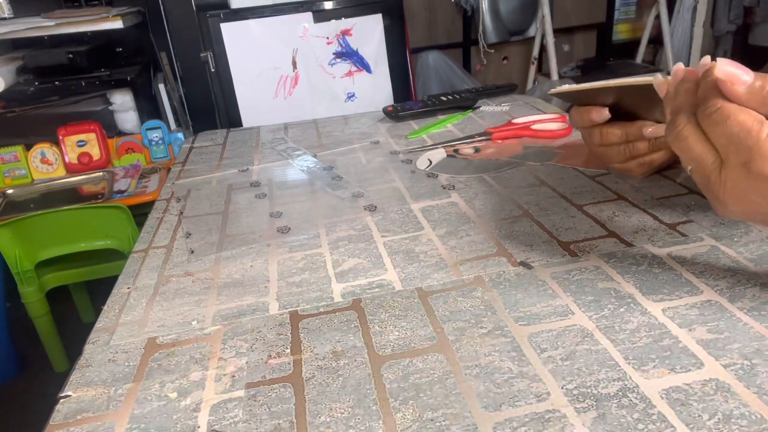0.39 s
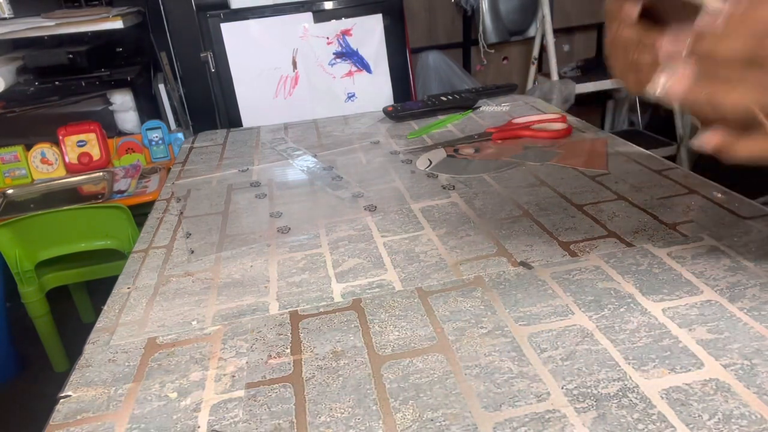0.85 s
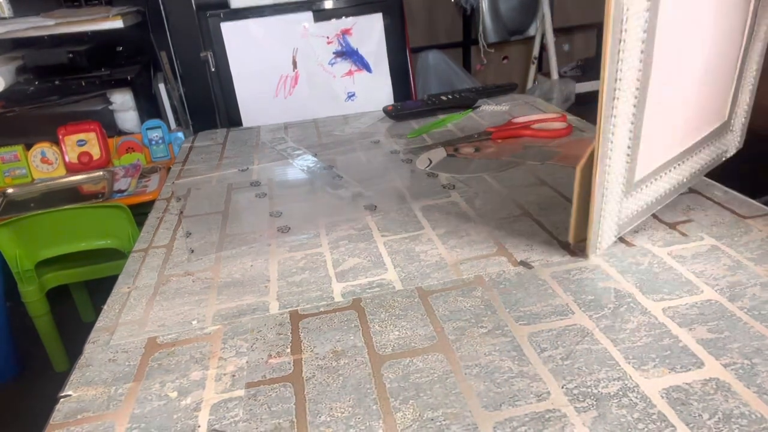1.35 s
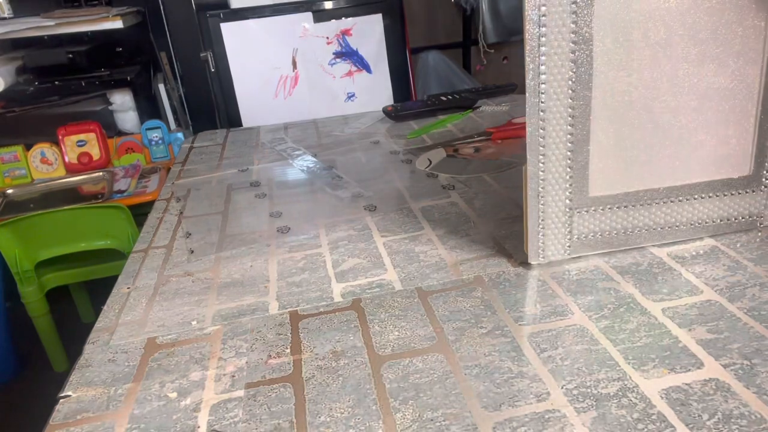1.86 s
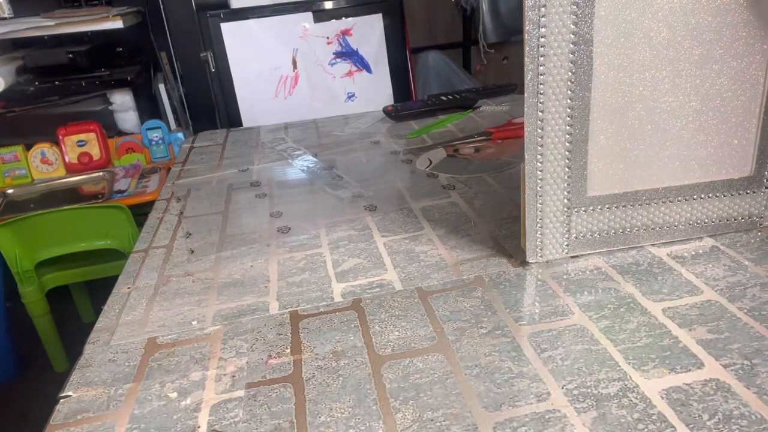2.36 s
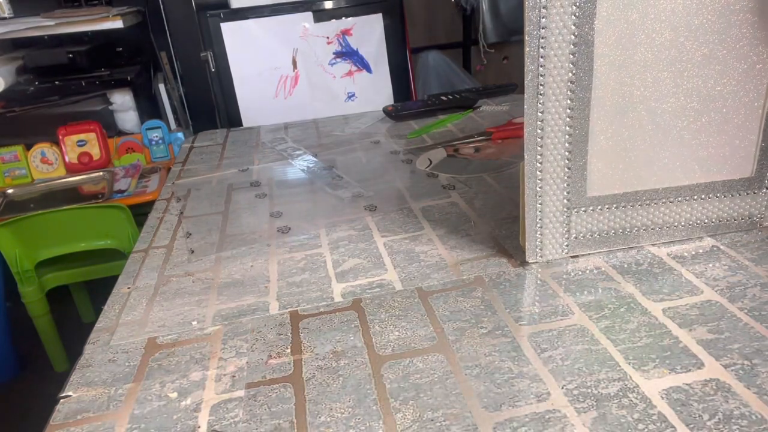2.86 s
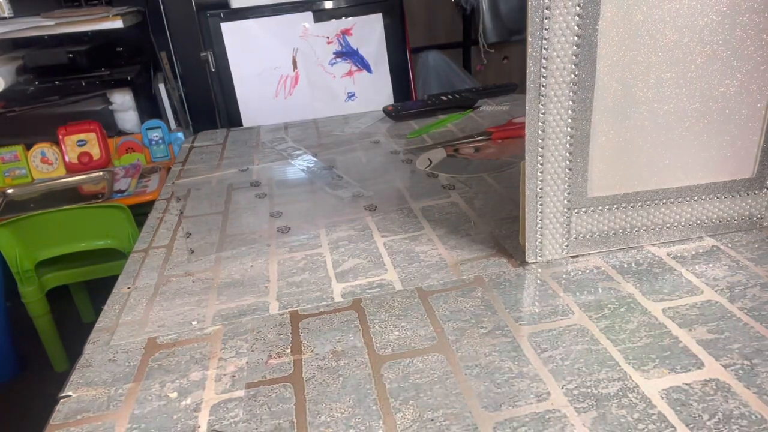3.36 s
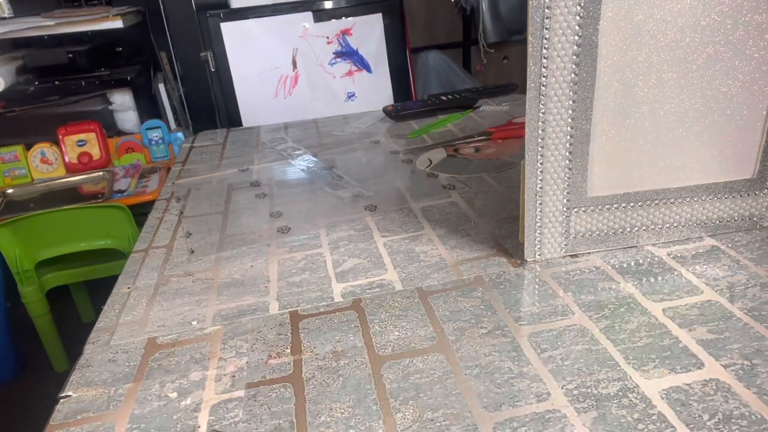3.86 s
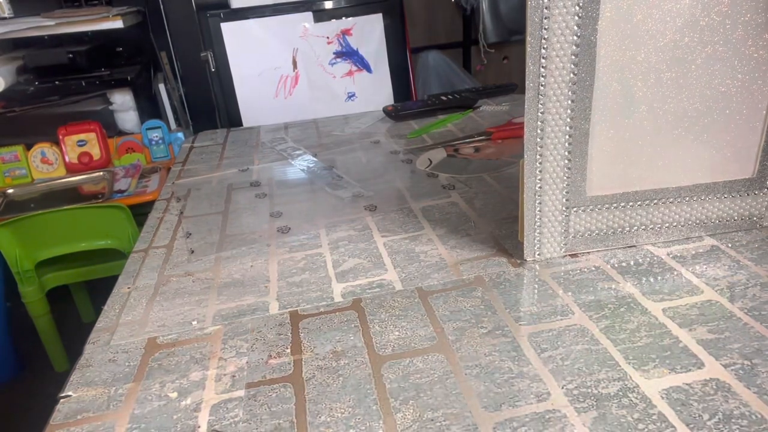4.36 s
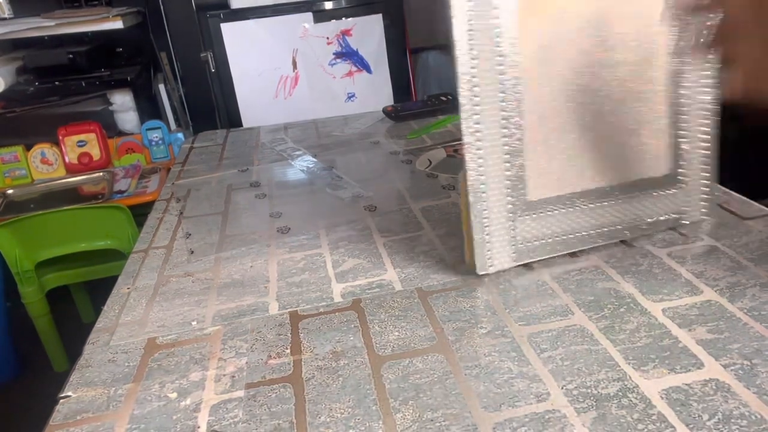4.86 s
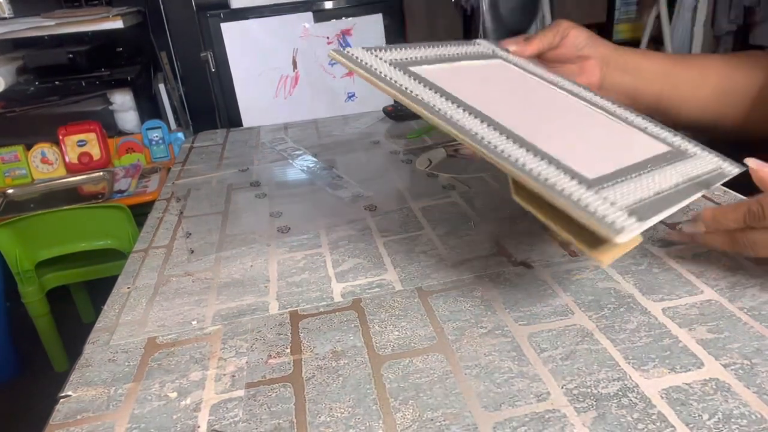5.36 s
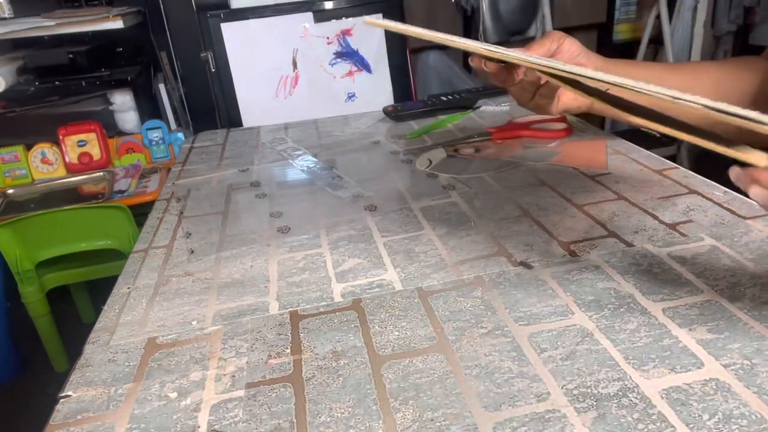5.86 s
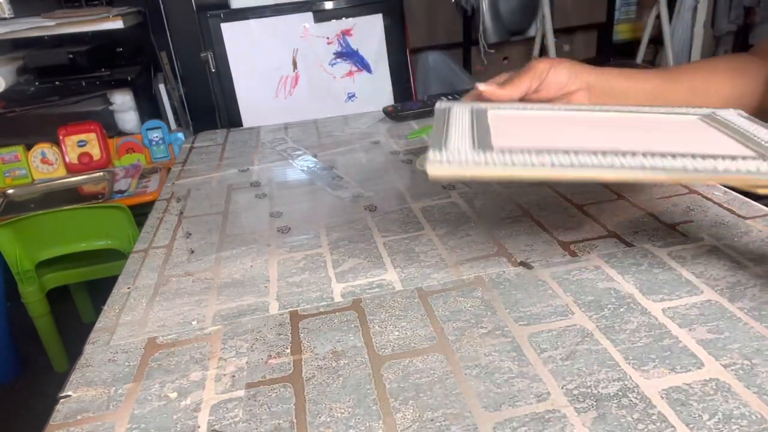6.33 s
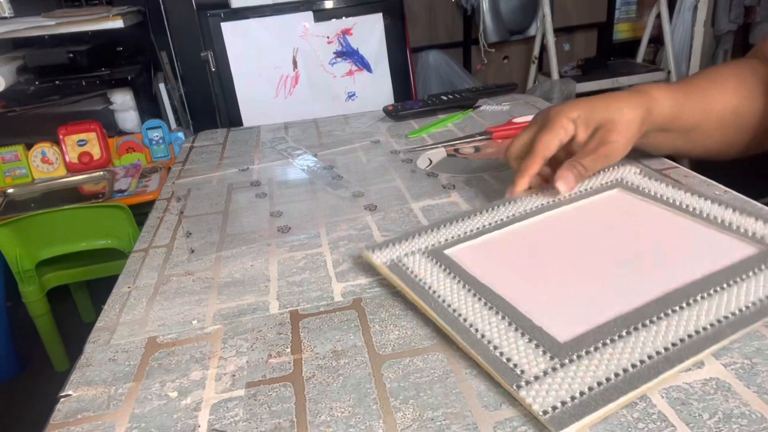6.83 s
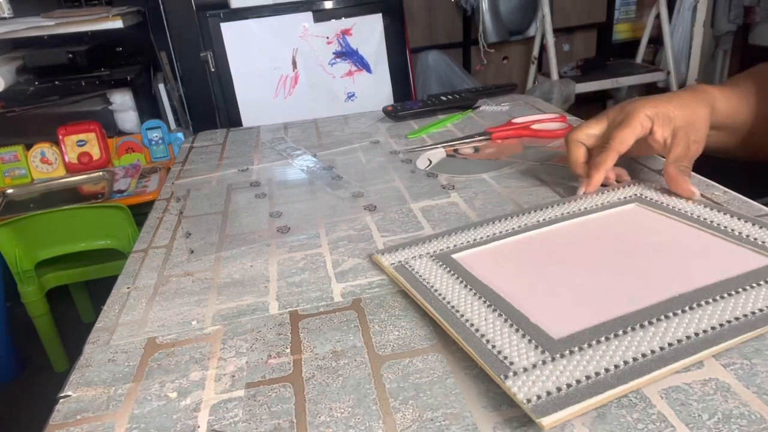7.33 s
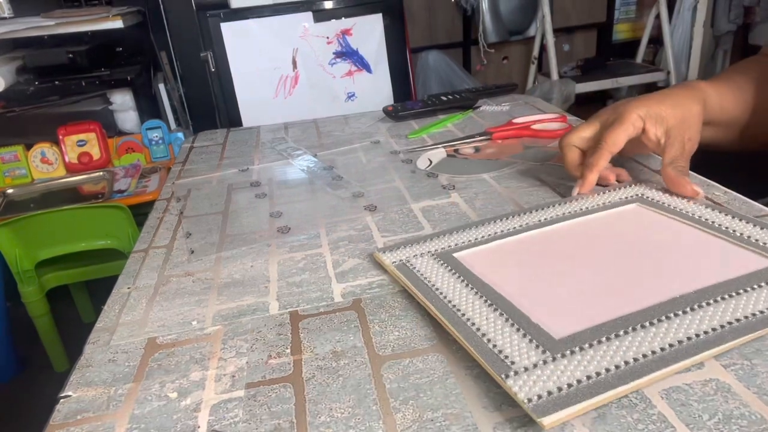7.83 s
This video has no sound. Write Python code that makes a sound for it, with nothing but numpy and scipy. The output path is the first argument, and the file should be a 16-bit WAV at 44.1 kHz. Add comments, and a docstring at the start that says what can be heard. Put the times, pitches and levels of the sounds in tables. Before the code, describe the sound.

Close, dry card knocks, sharp cracks and rubbing as a light frame is stood up, shifted and laid flat on a table in a quiet room.

```python
"""Over a faint room, hands take up a cardboard frame: first small cracks, then from 0.9 s knocks and scuffs.
A deep knock at 1.3 s sets it down; rubbing and shifting follow, with sharp cracks at 3.6 and 4.2 s.
At 4.45 s the frame is drawn in front of a phone on the table; near 5.4 s it is calmer and a low hum swells.
At 6.65 s it is laid down in a flurry of knocks, then faint touches. Noise bursts crack, damped modes knock,
filtered grains rub, noise-driven modes shake the table. The right microphone port hears the hands delayed."""
import sys
import numpy as np
from scipy import signal
from scipy.fft import rfft, irfft
from scipy.io import wavfile
from scipy.ndimage import uniform_filter1d

SR = 44100
rng = np.random.default_rng(int(sys.argv[2]) if len(sys.argv) > 2 else 0)


def makeup_ratio(level_db):
    """Linear amplitude ratio for a level in decibels (20 dB per factor of ten)."""
    decades = np.asarray(level_db, float) / 20
    return 10 ** decades


def dump_mix(stems):
    """Bounce the given channels to the path in sys.argv[1] as a 16-bit WAV at rate SR."""
    frames = np.atleast_2d(stems).T  # one column per channel
    limited = np.clip(frames, -1, 1)  # hard clip at full scale
    pcm = np.round(limited * 32767).astype(np.int16)
    wavfile.write(sys.argv[1], SR, pcm)


N = 351036
T = np.arange(N) / SR


def level(x, db):
    """Scale to an rms level."""
    return x * makeup_ratio(db) / np.sqrt(np.mean(x ** 2))


def curves(table):
    """Columns of a table, interpolated to one value a sample."""
    s, *columns = np.transpose(table)
    return [np.interp(T, s, c) for c in columns]


def walk(rate_hz):
    """Random levels held 1 / rate_hz s and slewed; spread near 1."""
    k = int(SR / rate_hz)
    steps = np.repeat(rng.standard_normal(N // k + 1), k)
    return 1.2 * uniform_filter1d(steps, k)[:N]


def ring(x, peaks):
    """Sum of resonances (Hz, width Hz, dB) of alternating sign."""
    return sum((-1) ** k * makeup_ratio(db) * signal.lfilter(*signal.iirpeak(hz, hz / width_hz, fs=SR), x)
               for k, (hz, width_hz, db) in enumerate(peaks))


def favour(x, peaks, near_hz, slope_db):
    """Resonances weighted by their distance in octaves from a moving pitch, at steady total power."""
    weights = [makeup_ratio(-slope_db * np.abs(np.log2(p[0] / near_hz))) for p in peaks]
    parts = [(-1) ** k * ring(x, [p]) for k, p in enumerate(peaks)]
    power = sum(w ** 2 * np.mean(y ** 2) for w, y in zip(weights, parts))
    return sum(w * y for w, y in zip(weights, parts)) / np.sqrt(power)


def add(out, s, sound, pan_db):
    """Place a sound between the ports; pan_db is left minus right."""
    i = int(s * SR)
    n = min(len(sound), N - i)
    out[:, i:i + n] += sound[:n] * makeup_ratio(np.array([[pan_db], [-pan_db]]) / 2)


# How the frame is held. Each row: start in seconds, knocks left minus right in dB,
# upper table modes re deep in relative dB, favoured card body in Hz, favoured sheet in Hz,
# favoured table pitch in Hz, share of a knock that rings freely (0-1).
POSES = [(0.0, -0.5, -8.5, 520, 2160, 186, 0.97), (1.2, 5, -1, 345, 2240, 157, 0.96),
         (1.5, 20.5, -3, 560, 1820, 170, 0.1), (2.05, 18.5, 1.5, 500, 3240, 173, 0.33),
         (3.7, 19, 0, 480, 1990, 155.6, .45), (4.8, 11, 1, 400, 2910, 161, 0.69),
         (5.199, 5.5, -15, 430, 3370, 199, 0.63), (6.62, 10, -4, 335, 1800, 212, 0.73),
         (7.2, 8.5, -6.5, 350, 2800, 185.7, 0.76)]


def pose():
    """Columns of the pose table, each held until the next pose."""
    s, *columns = np.transpose(POSES)
    return np.array(columns)[:, np.maximum(np.searchsorted(s, T, "right") - 1, 0)]


# Room noise spectrum. Each row: frequency in Hz, relative density in dB per Hz.
ROOM_SPECTRUM = [(18, -17), (30, 1.5), (64, -29), (239, -18.5), (540, -34), (844, -36.5), (6210, -45.5),
                 (8740, -54), (11700, -44), (16000, -56.5)]
ROOM_DB = -71


def room():
    """Faint steady air noise; its bass is alike at both ports."""
    f_hz = np.maximum(np.fft.rfftfreq(N, 1 / SR), 1)
    hz, db = np.transpose(ROOM_SPECTRUM)
    shape = makeup_ratio(np.interp(np.log(f_hz), np.log(hz), db))
    mid, side = rfft(rng.standard_normal((2, N))) * shape
    side = np.minimum(f_hz / 120, 1) * side
    return level(irfft(mid + side * np.array([[1], [-1]]), N), ROOM_DB)


HUM_S, HUM_LENGTH_S, HUM_HZ, HUM_WIDTH_HZ, HUM_DB = 5.42, 1.28, 92.3, 3.7, -65.5


def low_hum():
    """Narrow-band noise, a slightly wavering hum, swells for a while, alike at both ports."""
    tone = level(ring(rng.standard_normal(N), [(HUM_HZ, HUM_WIDTH_HZ, 0)]), HUM_DB)
    return tone * np.sin(np.pi * np.clip((T - HUM_S) / HUM_LENGTH_S, 0, 1)) ** .5


def murmur(x, modes, widen):
    """Modes driven by noise, damped further by the hands, at unit rms."""
    return level(ring(x, [(hz, widen / t60_s, db) for hz, db, t60_s in modes]), 0)


# Table top shaken by arms and frame. Each row: time in seconds, relative level in dB.
SHAKE_LEVELS = [(0.0, -60), (0.06, -72), (0.3, -95), (0.68, -77.5), (0.93, -60.5), (1.2, -74.5),
                (1.42, -53), (1.6, -66), (1.82, -47.5), (1.97, -69.5), (2.5, -67.5), (3.2, -63),
                (3.55, -69), (3.7, -55.5), (4.0, -71), (4.2, -50), (4.54, -64.5), (4.9, -52), (5.2, -65.5),
                (5.5, -64), (6.5, -60.5), (6.95, -47.5), (7.35, -61.5), (7.96, -62)]
# Deep, then upper table modes. Each row: frequency in Hz, relative level in dB, free t60 in seconds.
DEEP_MODES = [(48.54, -0.5, 0.15), (72.5, 1, 0.16), (103.1, -5.5, 0.21)]
TABLE_MODES = [(146.8, 3, 0.11), (178.5, 5.5, 0.11), (198.2, 0.5, 0.17), (271, -11, 0.085)]
SHAKE_WOBBLE_DB = 5.5


def shake():
    """Small uneven pushes keep the table top murmuring; the pose sets the share of the upper modes."""
    base_db = curves(SHAKE_LEVELS)[0] + 3.6
    upper_re_deep_db = uniform_filter1d(pose()[1], size=2000)
    upper_db = base_db - 4 + upper_re_deep_db + SHAKE_WOBBLE_DB * walk(8)
    deep_db = base_db + SHAKE_WOBBLE_DB * walk(6.6)
    mid, side = (makeup_ratio(deep_db) * murmur(push, DEEP_MODES, widen=3.3)
                 + makeup_ratio(upper_db) * murmur(push, TABLE_MODES, widen=6.4)
                 for push in rng.standard_normal((2, N)))
    return mid + makeup_ratio(-7) * side * np.array([[1], [-1]])


TICKS_PER_S, TICK_RE_GRAIN_DB = 68, 14  # lone fibres catching


def grains(spread_db):
    """Dense slips of very uneven size with lone ticks: one stream for the sheet's face, one for its edge."""
    ticks = makeup_ratio(TICK_RE_GRAIN_DB) * (rng.random(N) < TICKS_PER_S / SR)
    size = makeup_ratio(spread_db * rng.exponential(size=N)) + makeup_ratio(spread_db) * ticks
    return rng.standard_normal((2, N)) * size


# Fingers resting and sliding on card and tape. Each row: time in seconds, pressure in relative dB,
# dryness in dB (lowers the card body, slightly lifts the top).
RUB_PRESSURE = [(0.0, -105, 13), (0.55, -78.5, -1.5), (0.75, -63.5, 23), (1.0, -56, -13.5),
                (1.2, -65.5, 14), (1.35, -63, -13.5), (1.6, -65.5, 15), (1.88, -62, -12.5),
                (1.98, -82.5, -1), (2.3, -62.5, -2), (2.55, -69, 8), (2.8, -62.5, 7.5), (3.55, -55, 16.5),
                (3.9, -68, 8.5), (4.15, -60.5, -2.5), (4.48, -87, -4.5), (4.62, -49, -3.5), (5.03, -58, 6),
                (5.12, -82, 2.5), (5.6, -95.5, 5.5), (6.05, -84, 5), (6.2, -68.5, 9), (6.56, -62.5, 23),
                (6.75, -55, -4), (7.0, -65, -12), (7.3, -83, -15), (7.8, -80, 4), (7.96, -63.5, -20.5)]
# Short scuffs of an edge or fingertip. Each row: start in seconds, length in seconds,
# hiss, card body and top, each in relative dB.
SCUFF_STROKES = [(0.746, 0.1, -82, -74, -62.5), (0.874, 0.068, -31, -30.5, -73),
                 (0.933, 0.078, -42, -37, -63), (0.998, 0.11, -50, -62, -57),
                 (1.083, 0.11, -51, -59.5, -56), (1.294, 0.088, -45, -37, -56),
                 (1.52, 0.21, -52.5, -68.5, -65), (1.664, 0.18, -58, -59.5, -62),
                 (1.787, 0.095, -47.5, -63, -65), (1.841, 0.15, -55.5, -51.5, -66),
                 (2.321, 0.095, -52.5, -89, -63), (2.692, 0.044, -69, -52, -58),
                 (2.945, 0.044, -54, -57, -89), (3.137, 0.05, -44, -57, -54.5),
                 (3.46, 0.013, -66, -73, -56), (3.605, 0.076, -40, -60, -48), (3.76, 0.081, -73, -85, -69),
                 (4.073, 0.088, -76, -59, -80), (4.171, 0.08, -59, -40, -48.5),
                 (4.372, 0.06, -48, -46.5, -85), (4.558, 0.083, -47, -40.5, -62),
                 (4.636, 0.018, -60, -60, -45), (4.663, 0.047, -39, -50, -89),
                 (4.72, 0.08, -32.5, -42, -54), (4.856, 0.053, -64, -51, -58),
                 (5.006, 0.077, -65, -55, -68), (5.138, 0.059, -98, -70, -75),
                 (5.251, 0.12, -80, -90.5, -79), (5.438, 0.11, -72, -91, -77.5),
                 (5.67, 0.08, -70, -78.5, -72.5), (5.702, 0.054, -58.5, -75, -66.5),
                 (5.787, 0.14, -74.5, -79, -83), (5.983, 0.14, -69.5, -60, -69),
                 (6.103, 0.11, -95, -60.5, -73), (6.267, 0.18, -59, -75.5, -58),
                 (6.48, 0.36, -86, -66, -51.5), (6.642, 0.079, -46, -36, -57), (6.76, 0.061, -62, -61, -55),
                 (6.807, 0.06, -71, -48, -75), (6.897, 0.068, -55, -44, -60), (7.31, 0.04, -95, -57.5, -73),
                 (7.924, 0.046, -74.5, -62, -58.5)]
# Scuffs that gather and stop short against an edge. Columns as for the scuffs above.
STOP_STROKES = [(1.689, 0.089, -53, -45.5, -75), (2.77, .13, -58, -99, -65),
                (3.178, 0.054, -47, -97, -48.5), (3.297, 0.053, -85, -63, -62.5),
                (3.487, 0.14, -44.5, -68, -53), (5.688, 0.11, -47.5, -65.5, -53),
                (6.593, 0.089, -53, -66, -43.5), (7.117, .11, -79.5, -50, -68)]
SCUFF_PEAK, STOP_PEAK = .3, 0.78  # place of the peak within a stroke, 0-1
# Card modes. Each row: frequency in Hz, relative level in dB, free t60 in seconds.
CARD_MODES = [(324.8, -1, 0.11), (390, 0.5, 0.066), (497.5, -1, 0.041), (560, 1.5, 0.088),
              (645.4, 1, 0.079), (726, -2.5, 0.028), (1010, -6.5, 0.011), (1090, -4.5, 0.017),
              (1300, -18.5, 0.03)]
# Resonances of the sheet's face, then of its edge. Each row: frequency in Hz, width in Hz, relative dB.
SHEET_PEAKS = [(1650, 1100, 3), (2430, 1460, 4.5), (3330, 2200, 7), (4290, 1400, 11.5)]
SHEET_TOP_PEAKS = [(7000, 11800, -2.5), (8790, 1100, 9), (13330, 2900, -1), (14260, 5000, -2)]
TOP_RE_HISS_DB, TOP_PER_DRYNESS = -2.5, 0.1


def rub():
    """Skin and edges slip over the sheet, fluttering, and set its body humming."""
    pressure_db, dry_db = curves(RUB_PRESSURE)
    top_re_hiss_db = TOP_RE_HISS_DB + TOP_PER_DRYNESS * dry_db
    gain = makeup_ratio(pressure_db + np.array([0 * T, -dry_db, top_re_hiss_db]))
    strokes = [(SCUFF_PEAK, r) for r in SCUFF_STROKES] + [(STOP_PEAK, r) for r in STOP_STROKES]
    for peak, (s, length_s, *db) in strokes:
        u = np.linspace(0, 1, int(length_s * SR))
        i = min(int(s * SR), N - len(u))
        swell = np.sin(np.pi * u ** (np.log(.5) / np.log(peak)))
        gain[:, i:i + len(u)] += makeup_ratio(np.array(db))[:, None] * swell
    flutter_db = 2.5 * walk(45) + np.array([1.5 * walk(70) for _ in range(3)])
    hiss, body, top = gain * makeup_ratio(flutter_db)
    # the grip wanders, and with it the resonances that speak
    wander_octaves = np.array([0.2 * walk(12), 0.19 * walk(12)])
    body_hz, sheet_hz = pose()[2:4] * 2 ** wander_octaves
    slips, edge_slips = grains(spread_db=3.0)
    held_card = [(hz, 4.1 / t60_s, db) for hz, db, t60_s in CARD_MODES]  # hands damp and widen the modes
    sound = hiss * favour(slips, SHEET_PEAKS, sheet_hz, slope_db=10.5)
    sound = sound + top * level(ring(edge_slips, SHEET_TOP_PEAKS), 0)
    sound = sound + body * favour(slips, held_card, body_hz, slope_db=9.5)
    return sound * makeup_ratio(np.array([[.7], [-.7]]))


# An edge sliding on the table. Each row: start in seconds, length in seconds, level in dB.
SING_STROKES = [(4.988, 0.092, -66.5), (6.72, 0.1, -56), (6.845, 0.043, -48.5)]
SING_HZ, SING_WIDTH_HZ = 1090, 34


def sing():
    """A dragged edge keeps a narrow card mode sounding."""
    out = np.zeros((2, N))
    tone = level(ring(rng.standard_normal(N), [(SING_HZ, SING_WIDTH_HZ, 0)]), 0)
    for s, length_s, db in SING_STROKES:
        n = int(length_s * SR)
        add(out, s, makeup_ratio(db) * tone[int(s * SR):][:n] * np.sqrt(np.hanning(n)), 2.0)
    return out


def blow(modes, rise_s, chance, near_hz=None):
    """Damped modes with a common rise, each with its own strength, pitch and phase; peak 1."""
    t = np.arange(int(.35 * SR)) / SR
    hz, db, t60_s = np.transpose(modes)[:, :, None]
    if near_hz:
        db = db - 25.5 * np.abs(np.log2(hz / near_hz))  # the spot struck favours some modes
    tone = np.sin(2 * np.pi * (hz * (1 + 0.033 * chance[0]) * t + 0.19 * chance[1]))
    decay = np.exp(-np.log(1000) * t / t60_s)
    sound = np.sum(makeup_ratio(db + 3.6 * chance[2]) * tone * decay, axis=0)
    sound = sound * (1 - np.exp(-(t / rise_s) ** 2))
    return sound / np.max(np.abs(sound))


SNAP_FROM_HZ, SNAP_TO_HZ, SNAP_FALL_S = 2030, 350, .0014
SNAP_FADE_S, SNAP_RE_CARD_DB = 0.002, -2


def card_snap():
    """The bending wave of a knock arrives treble first: a short falling chirp."""
    t = np.arange(600) / SR
    fall = (SNAP_FROM_HZ - SNAP_TO_HZ) * SNAP_FALL_S * (1 - np.exp(-t / SNAP_FALL_S))
    turns = SNAP_TO_HZ * t + fall
    return np.sin(2 * np.pi * turns) * t / SNAP_FADE_S * np.exp(1 - t / SNAP_FADE_S)


# Contacts of card and table. Each row: start in seconds, card, table and deep table,
# each in relative dB, favoured card pitch in Hz.
KNOCK_HITS = [(0.33, -54.5, -88, -71, 1130), (0.605, -49, -91, -68, 1020), (0.88, -22, -59, -55, 610),
              (0.884, -28.5, -58.5, -59, 1080), (0.898, -25, -35.5, -36.5, 530),
              (0.992, -31, -44.5, -75, 560), (1.302, -17, -21.5, -12, 328), (1.329, -21, -26, -36, 318),
              (1.344, -20, -20.5, -57, 330), (1.489, -49.5, -75, -74, 335), (1.733, -38, -54, -72, 560),
              (1.793, -49, -32, -36, 301), (1.919, -32, -50.5, -56.5, 473), (2.179, -33.5, -56, -85, 475),
              (2.351, -47, -56.5, -47, 562), (2.623, -37, -45.5, -41, 623), (2.672, -47.5, -63, -42, 660),
              (2.818, -56, -60, -51, 585), (2.959, -57, -47.5, -67, 388), (3.599, -39.5, -52.5, -43.5, 564),
              (3.678, -53.5, -45.5, -58, 418), (3.771, -33, -46, -50, 475), (3.882, -57.5, -76, -62, 417),
              (4.086, -36.5, -44, -59.5, 320), (4.19, -17, -26.5, -30, 485),
              (4.241, -48.5, -36, -39.5, 312), (4.376, -43.5, -54, -57.5, 497),
              (4.557, -48.5, -58, -38, 550), (4.615, -23.5, -37.5, -30.5, 420),
              (4.638, -33, -27, -30.5, 436), (4.73, -30.5, -67, -57, 686), (4.871, -36.5, -38.5, -42, 520),
              (4.961, -51.5, -33.5, -37.5, 530), (5.144, -52.5, -56, -57.5, 360),
              (5.669, -56.5, -61, -57.5, 556), (5.999, -45, -61.5, -63.5, 522),
              (6.115, -46.5, -78, -68, 650), (6.308, -58.5, -84, -55.5, 665),
              (6.477, -49.5, -51.5, -57.5, 340), (6.549, -51, -55.5, -48.5, 550),
              (6.653, -19, -14, -35.5, 487), (6.73, -38.5, -29, -38.5, 320), (6.776, -36, -56, -36, 340),
              (6.794, -22.5, -34, -37, 337), (6.808, -32, -49, -47, 323), (6.842, -23, -17, -59, 322),
              (6.914, -36.5, -30.5, -31, 370), (6.944, -41, -29, -48, 321), (7.022, -38, -28, -41, 320),
              (7.082, -43.5, -37.5, -42, 390), (7.169, -48, -43, -46, 444), (7.288, -51, -43, -48, 427),
              (7.389, -64, -49.5, -66, 320), (7.561, -59.5, -53, -51, 372), (7.589, -54, -77.5, -56, 633),
              (7.616, -51, -61, -46, 610), (7.851, -35, -41, -57, 330), (7.921, -38.5, -55, -45.5, 312),
              (7.937, -33, -36, -42, 367)]


def knocks():
    """Each contact snaps and rings the card; the table's modes rise more slowly."""
    out, held, snap = np.zeros((2, N)), pose(), card_snap()
    chances = rng.standard_normal((len(KNOCK_HITS), 3, 3, len(CARD_MODES), 1))
    for (s, card_db, table_db, deep_db, card_hz), chance in zip(KNOCK_HITS, chances):
        pan_db, *_, table_hz, free = held[:, int(s * SR)]
        free = np.clip(free, 0, 1)
        add(out, s, makeup_ratio(card_db) * free * blow(CARD_MODES, 0.00053, chance[0], card_hz), pan_db)
        add(out, s, makeup_ratio(card_db + SNAP_RE_CARD_DB) * (1 - free) * snap, pan_db / 2)
        # bending waves in the table reach both ports nearly alike
        table = blow(TABLE_MODES, 0.0074, chance[1][:, :len(TABLE_MODES)], table_hz)
        deep = blow(DEEP_MODES, 0.012, chance[2][:, :len(DEEP_MODES)])
        add(out, s, makeup_ratio(table_db + 2.0) * table + makeup_ratio(deep_db + 0.5) * deep, 0.16 * pan_db)
    return out


# Card and tape cracks. Each row: time in seconds, sheet and fold level in relative dB,
# top level in relative dB, ring of the fold in Hz.
CRACK_BURSTS = [(0.3302, -54, -100, 1330), (0.603, -41.5, -72, 1250), (0.636, -54, -72, 1420),
                (0.7357, -48, -79, 1810), (0.821, -57, -58, 1450), (0.851, -50.5, -72, 1120),
                (0.8784, -31.5, -59, 1300), (0.897, -18.5, -47, 1060), (1.001, -34, -33.5, 1110),
                (1.2415, -59.5, -42.5, 1820), (1.2953, -49, -37, 1250), (1.3062, -22, -36, 1210),
                (1.3514, -28.5, -57.5, 990), (1.467, -47.5, -45.5, 3200), (1.4877, -48, -54, 1060),
                (1.541, -48, -62, 1680), (1.5616, -36, -67, 1930), (1.6247, -41, -73, 1740),
                (1.735, -32.5, -43, 1630), (1.7703, -35, -56, 1010), (1.918, -31.5, -55, 1090),
                (2.1787, -31, -42.5, 1000), (2.32, -54, -46.5, 1650), (2.3484, -43, -39, 1480),
                (2.6191, -33.5, -60, 1650), (2.6901, -37.5, -39.5, 2070), (2.8507, -59, -68, 3190),
                (2.9573, -46.5, -73, 1080), (3.085, -53, -65, 2930), (3.209, -53, -50, 3050),
                (3.3414, -58, -43, 2160), (3.355, -51, -47.5, 2130), (3.4645, -52, -42.5, 1880),
                (3.5996, -11, -22, 2470), (3.7717, -23, -42, 1900), (3.8088, -62.5, -50, 1790),
                (4.0831, -23.5, -37.5, 1900), (4.1903, -15, -42.5, 2000), (4.1956, -25.5, -28, 1120),
                (4.3, -74, -59, 1690), (4.378, -38, -66, 1200), (4.452, -56.5, -78, 3300),
                (4.556, -43, -42, 2050), (4.578, -38.5, -56, 3040), (4.6006, -38.5, -36.5, 1670),
                (4.613, -26.5, -36.5, 1090), (4.7053, -36, -58, 1880), (4.7309, -33, -34, 1640),
                (4.8713, -39.5, -41.5, 1040), (5.1408, -75.5, -63, 1640), (5.668, -50, -75, 2970),
                (5.9927, -48, -77, 2800), (6.117, -49.5, -91, 980), (6.6498, -20, -32, 1020),
                (6.8046, -31, -79, 1480), (6.841, -27, -95, 1340), (6.8778, -55, -52.5, 1150),
                (6.9094, -34, -81, 1420), (6.9357, -47, -48, 1290), (6.9922, -68, -54, 1070),
                (7.0194, -50, -60, 1150), (7.0813, -73, -85, 1020), (7.1712, -60, -63.5, 1090),
                (7.288, -71, -72, 3090), (7.309, -62, -78, 1350), (7.4022, -87.5, -65, 3230),
                (7.4494, -74, -65, 2665), (7.5702, -71.5, -57.5, 3270), (7.5917, -55.5, -62, 1072),
                (7.6305, -56.5, -61, 1082), (7.814, -79, -67.5, 3000), (7.849, -52, -63.5, 1330),
                (7.9218, -41.5, -67, 1590), (7.9435, -36.5, -49.5, 1550)]
CRACK_S, CRACK_PAN_DB, PAN_SCATTER_DB = .0014, .5, 1.5
SKIRT_S, SKIRT_DB = .004, -16.5  # faint noise swells just before each burst and fades after it
SHARP_SHARE = 0.13  # a crack with little top also stirs the sheet less, dB per dB


def cracks():
    """A fold or a patch of glue gives way in a noise burst; the treble burst is the shortest."""
    low, top, fold = np.zeros((3, 2, N))
    t = np.arange(-600, 400) / SR
    u = np.maximum(t / CRACK_S, 0)
    swell = u * np.exp(1 - u)
    skirt = makeup_ratio(SKIRT_DB) * np.exp(-np.abs(t) / SKIRT_S)

    def even(noise):
        return noise / np.sqrt(np.sum((noise * swell) ** 2) / np.sum(swell ** 2))

    noises = rng.standard_normal((len(CRACK_BURSTS), 2, len(t)))
    scatter = rng.standard_normal(len(CRACK_BURSTS))
    for (s, db, top_db, fold_hz), (face, edge), chance in zip(CRACK_BURSTS, noises, scatter):
        pan_db = CRACK_PAN_DB + PAN_SCATTER_DB * chance
        slip, edge_slip = even(face), even(edge)
        start_s = s - 0.54 * CRACK_S + t[0]
        low_db = db + SHARP_SHARE * (top_db - db + 8)
        add(low, start_s, slip * (swell ** 0.8 + skirt) * makeup_ratio(low_db), pan_db)
        add(fold, start_s, ring(slip * swell, [(fold_hz, .4 * fold_hz, db)]), pan_db)
        add(top, start_s, edge_slip * (swell ** 2.2 + skirt / 2) * makeup_ratio(top_db), pan_db)
    return makeup_ratio(-12.5) * ring(low, SHEET_PEAKS) + makeup_ratio(6.5) * fold + makeup_ratio(8.5) * ring(top, SHEET_TOP_PEAKS)


ECHO_DB, ECHO_T60_S, ECHO_GAP_S = -13, 0.21, 0.0054


def echo(x):
    """Nearby walls return a short tail, partly shared by the ports, duller as it fades."""
    t = np.arange(int(.4 * SR)) / SR
    same, *own = rng.standard_normal((3, len(t))) * (t > ECHO_GAP_S)
    noise = same + 2.0 * np.array(own)
    dull = uniform_filter1d(noise, size=5)
    fade = np.exp(-np.log(1000) * t / ECHO_T60_S)
    tail = dull * fade + 0.36 * (noise - dull) * fade ** 1.6
    tail = tail / np.sqrt(np.sum(tail ** 2) / 2)
    thin = signal.lfilter(*signal.butter(1, 900., "high", fs=SR), x)  # walls return little of the close bass
    return makeup_ratio(ECHO_DB) * signal.fftconvolve(thin, tail, axes=1)[:, :N]


# Lead of the left port over the right, from their spacing and housing: hands aside, then frame in front.
# Each row: frequency in Hz, phase lead in radians.
LEAD_ASIDE = [(0, 0), (520, 1.5), (1120, .4), (1980, 2.2), (2600, 3.0), (3300, 2.0), (5170, 4.6),
              (7150, 8.2), (8270, 9.2), (9560, 9.8), (11100, 12.5), (12300, 12.8), (13400, 15.4),
              (15500, 16.2), (16500, 16.3)]
LEAD_FRONT = [(0, 0), (480, .6), (1100, 0), (1900, 1.1), (2800, .3), (4200, .8), (5800, .5), (7300, 2.4),
              (9560, 3.4), (11000, 6.1), (12300, 6.5), (13400, 9.1), (16500, 9.8)]
DRAWN_IN_S = 4.45


def scene():
    """Hands and their echo reach the right port late; table, room and hum join in."""
    hands = cracks() + knocks() + rub() + sing()
    hands = hands + echo(hands)
    f_hz = np.fft.rfftfreq(N, 1 / SR)
    aside, front = (irfft(rfft(hands[1]) * np.exp(-1j * np.interp(f_hz, *np.transpose(lead))), N)
                    for lead in (LEAD_ASIDE, LEAD_FRONT))
    drawn = np.clip((T - DRAWN_IN_S) * 20, 0, 1)  # over 0.05 s
    ports = np.array([hands[0], aside + drawn * (front - aside)])
    return ports + shake() + room() + low_hum()


def roll_off(x):
    """The treble ends steeply here."""
    return signal.sosfilt(signal.butter(12, 16950, fs=SR, output="sos"), x)


def record(dry):
    """The phone cuts the deepest bass below 48 Hz and the top above 16.6 kHz."""
    x = signal.sosfilt(signal.butter(4, 48., "high", fs=SR, output="sos"), dry)
    x = signal.sosfilt(signal.ellip(8, .2, 70, 16600, fs=SR, output="sos"), x)
    return roll_off(x)


dry = scene()
out = record(dry)
dump_mix(out)
```